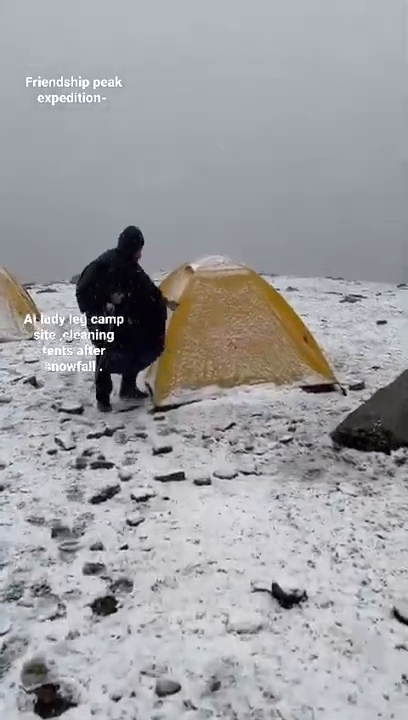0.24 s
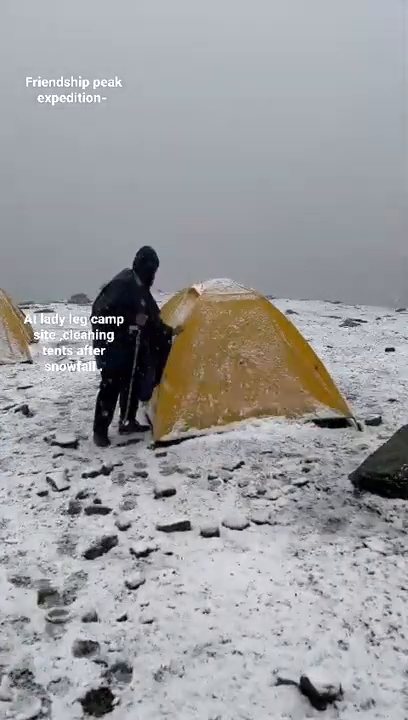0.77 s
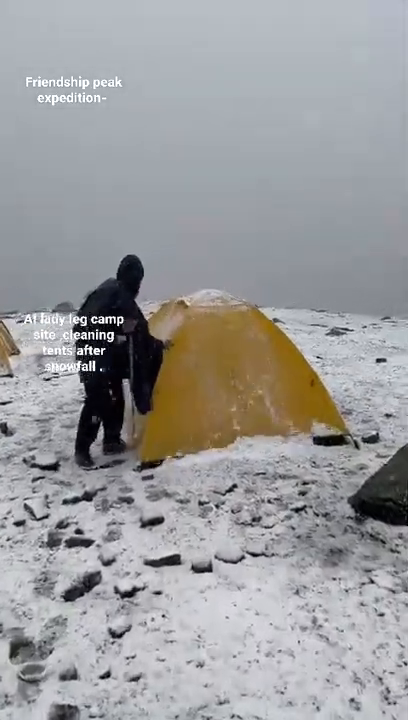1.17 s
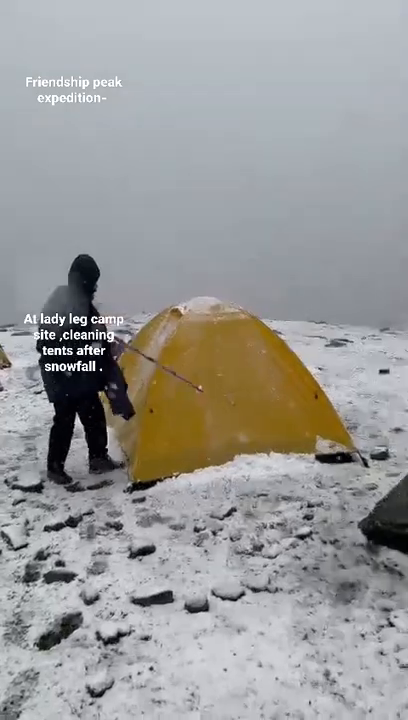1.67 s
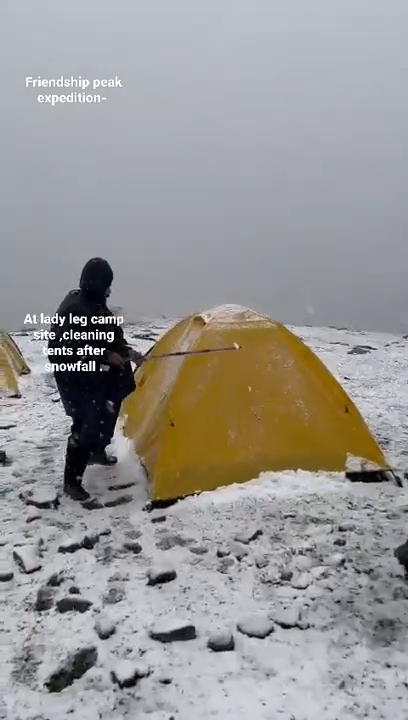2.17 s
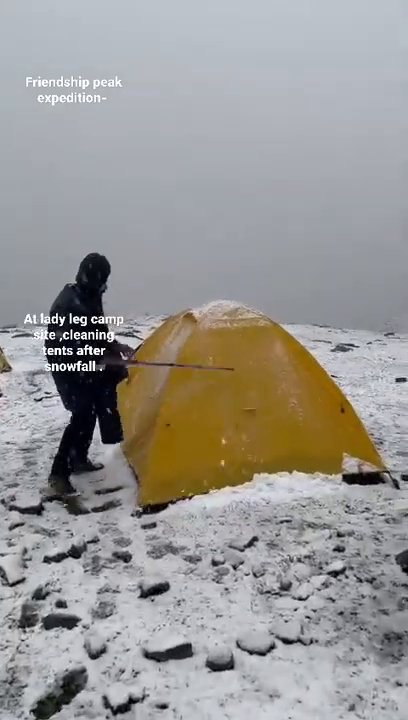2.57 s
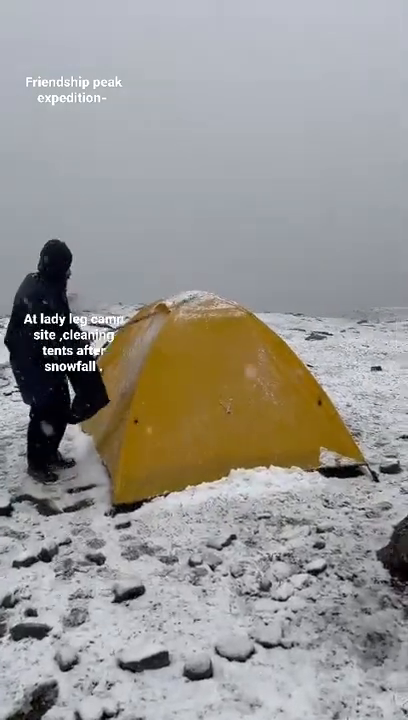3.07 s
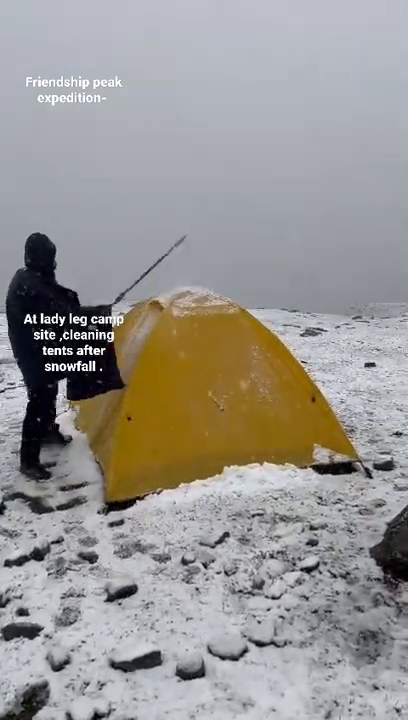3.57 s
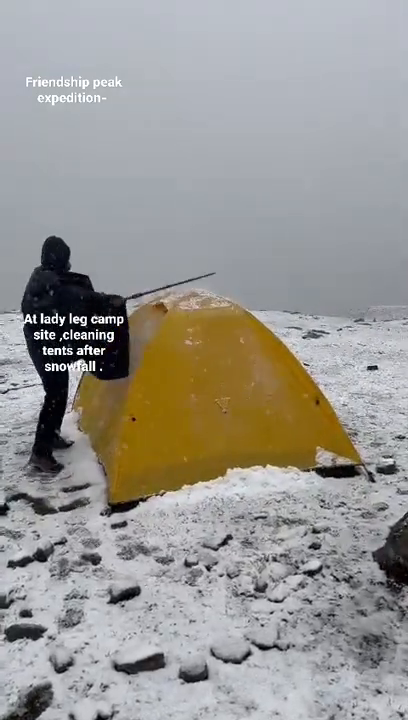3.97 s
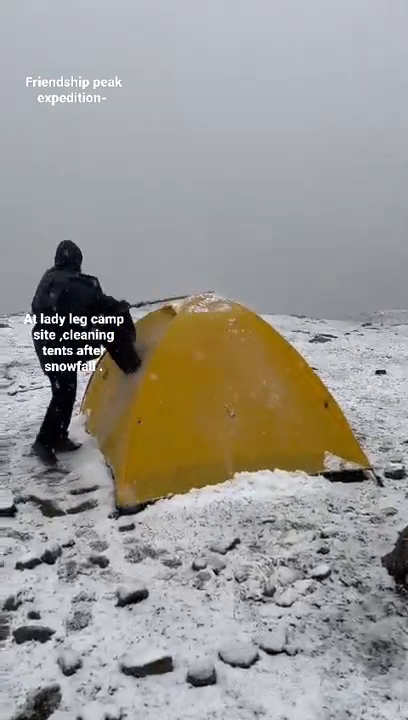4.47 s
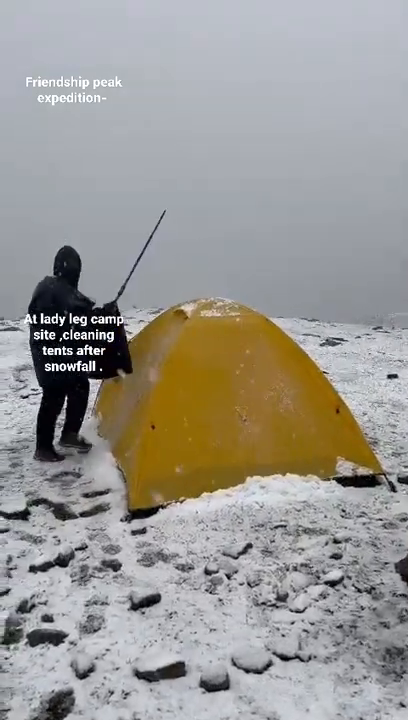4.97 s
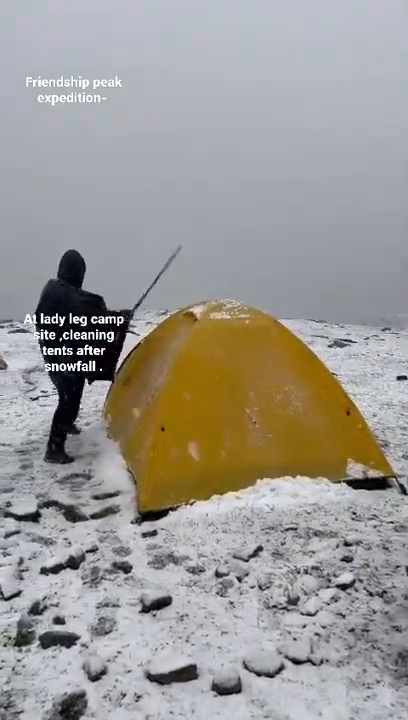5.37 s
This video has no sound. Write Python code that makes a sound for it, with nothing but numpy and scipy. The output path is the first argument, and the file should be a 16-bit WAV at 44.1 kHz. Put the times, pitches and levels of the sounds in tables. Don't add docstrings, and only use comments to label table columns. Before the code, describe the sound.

On an open snowy slope in light wind, tent cloth rustles and snow slides off with soft low thuds and small ticks. After about two and a half seconds a pole smacks the taut fabric repeatedly, hardest around four seconds, each crack followed by a hollow boom, flutter and sliding snow. After a pause, one last smack. Heard from a phone some metres away, dry and without echo.

```python
import sys
import numpy as np
from scipy import signal
from scipy.fft import rfft, irfft, next_fast_len
from scipy.io import wavfile
from scipy.ndimage import uniform_filter1d, minimum_filter1d

SR = 44100
rng = np.random.default_rng(int(sys.argv[2]) if len(sys.argv) > 2 else 0)


def boost(x):
    u = np.asarray(x, float) / 20
    return 10 ** u


def inscribe(sig):
    pcm = np.round(np.clip(np.atleast_2d(sig).T, -1, 1) * 32767)
    wavfile.write(sys.argv[1], SR, pcm.astype(np.int16))


N = 248238

# [t/s, crack level/dB, pole tick f/Hz, tick level over crack/dB, loosened snow level over crack/dB]
BLOWS = [
    (2.156, -52, 1840, 20, -27),
    (2.494, -18, 1550, -33, -8.5),
    (2.945, -19.5, 1570, 1, -13.5),
    (3.397, -20, 1780, -29, -8),
    (3.711, -12, 4160, -10, -18),
    (3.984, -8, 1790, -20, -17.5),
    (4.269, -12.5, 2220, -12, -13.5),
    (4.539, -12.5, 3010, 5, -11),
    (5.522, -17, 2620, 7, -11.5),
]
# [f/Hz, level/dB]
CRACK = [(150, -1.5), (330, -2.5), (720, 5), (1300, 1.5), (2200, -2), (3500, -4.5), (6000, -11),
         (9000, -14.5), (11500, -23), (12500, -48)]
# [f/Hz, arrival t/s]
LAG = [(100, 0.01323), (300, 0.00709), (600, 0.0026), (1500, 0.0005), (4000, 0.0002)]
# [f/Hz, level/dB]
SLAP = [(150, 2), (280, 1), (450, -1), (700, -11.5), (1100, -59)]


def evened(x):
    return x / np.sqrt(np.mean(x ** 2) + 1e-20)


def peak_one(x):
    return x / abs(x[0]).max()


def read(points, hz):
    f, value = np.transpose(points)
    return np.interp(np.log(hz + 1), np.log(f + 1), value, left=value[0])


def add(mix, s, sound):
    part = mix[..., round(s * SR):][..., :sound.shape[-1]]
    part += sound[..., :part.shape[-1]]


def colour(x, points, lag=None):
    size = next_fast_len(x.shape[-1] + 2048)
    hz = np.fft.rfftfreq(size, 1 / SR)
    gain = boost(read(points, hz)) * (hz < 1.05 * points[-1][0])
    if lag is not None:
        phase = 2 * np.pi * np.cumsum(read(lag, hz)) * hz[1]
        gain = gain * np.exp(-1j * phase)
    return irfft(rfft(x, size) * gain, size)[..., :x.shape[-1]]


def bed(points, patchy_db, flicker_db, grain_db, size):
    grains = boost(grain_db * np.repeat(rng.exponential(1, N // 40 + 1), 40)[:N])
    noise = colour(grains * rng.standard_normal((2, N)), points)
    f, t, z = signal.stft(noise, SR, nperseg=size)
    patches = uniform_filter1d(rng.standard_normal(z.shape[1:]), 5, 0)
    patches = evened(uniform_filter1d(patches, 8, 1))
    flicker = evened(uniform_filter1d(rng.standard_normal(len(t)), 3))
    z *= boost(patchy_db * patches + flicker_db * flicker)
    return evened(signal.istft(z, SR, nperseg=size)[1][:, :N])


def rustle():
    # [t/s, wind level/dB, drifting snow level/dB]
    weather = [(0, -56.5, -83.5), (.65, -49.5, -73.5), (1.45, -56, -64), (1.9, -55, -68),
               (2.25, -53.5, -77.5), (2.5, -55, -80.5), (2.9, -53, -65.5), (3.28, -53.5, -64.5),
               (3.499, -58, -68.5), (3.95, -52, -67.5), (4.45, -65, -63.5), (4.9, -59.5, -64),
               (5.3, -59, -69.5), (5.63, -48.5, -77.5)]
    # [start t/s, hold t/s, rustle level/dB, rumble level over rustle/dB]
    stirs = [(0.162, 0.036, -61.5, 1), (0.443, 0.12, -68, 1), (0.74, 0.13, -50, 8), (0.952, 0.097, -45, 4),
             (1.131, .26, -53, 5.5), (1.62, 0.027, -57.5, -2), (2.317, .12, -61.5, 2.5),
             (2.518, 0.045, -48.5, -3), (2.553, 0.027, -53.5, 8), (2.978, 0.12, -60.5, 0),
             (3.73, 0.15, -61, -9), (4.046, .08, -56.5, 4.5), (4.317, 0.047, -55.5, 7),
             (4.62, 0.093, -66.5, 17), (5.56, 0.089, -54.5, -1)]
    # [f/Hz, level/dB]
    body_curve = [(150, -2), (300, 0), (600, -3.5), (1200, -5), (2500, -9.5), (5000, -13), (7000, -19)]
    # [f/Hz, level/dB]
    fizz_curve = [(1500, -5.5), (3500, -4), (6000, -8.5), (8500, -6), (10500, -6.5), (11600, -6),
                  (12300, -50)]
    # [f/Hz, level/dB]
    rumble_curve = [(20, -36), (40, 4.5), (60, 1), (120, -0.5), (220, -8), (350, -22.5), (600, -20.5)]
    rise_db_per_s, fall_db_per_s = 300, 64.5
    t = np.arange(N) / SR
    s, *columns = np.transpose(weather)
    wind, drift = (boost(np.interp(t, s, c)) for c in columns)
    stir, heft = np.zeros(N), np.zeros(N)
    for start, hold, db, rumble_db in stirs:
        swell_db = np.maximum(rise_db_per_s * (start - t), 0)
        decay_db = np.maximum(fall_db_per_s * (t - start - hold), 0)
        shape = boost(db - swell_db - decay_db)
        stir = np.hypot(stir, shape)
        heft = np.hypot(heft, boost(rumble_db) * shape)
    weather_stir = np.hypot(boost(-10.5) * wind, boost(-4.5) * drift)
    cloth = np.hypot(stir, weather_stir)
    snow = np.hypot(drift, boost(-15.5) * stir)
    body = boost(1.5) * cloth * bed(body_curve, patchy_db=3.0, flicker_db=1.5, grain_db=1.5, size=512)
    fizz = boost(9.5) * snow * bed(fizz_curve, patchy_db=1.4, flicker_db=1.2, grain_db=0.0, size=512)
    rumble = bed(rumble_curve, patchy_db=5.5, flicker_db=1.0, grain_db=0.35, size=1024)
    return body + fizz + boost(0.5) * np.hypot(wind, heft) * rumble


def moan(width_hz=11.7):
    # [t/s, f/Hz, level/dB]
    course = [(0, 240.7, -87), (0.298, 290.2, -64.5), (0.6, 248.2, -74), (1.697, 149.6, -69),
              (2.1, 238.8, -68), (2.399, 203, -90.5), (3.601, 202, -87), (4.15, 180, -61),
              (4.5, 243.4, -64), (4.9, 208, -71), (5.25, 214.7, -62.5), (5.63, 207, -81)]
    s, *columns = np.transpose(course)
    hz, db = (np.interp(np.arange(N) / SR, s, c) for c in columns)
    lowpass = signal.butter(2, width_hz / 2, fs=SR)
    slow = signal.lfilter(*lowpass, rng.standard_normal((2, N)))
    carrier = np.exp(2j * np.pi * np.cumsum(hz) / SR)
    return boost(db) * evened(((slow[0] + 1j * slow[1]) * carrier).real)


def boom(hz, cycles, sag):
    t = np.arange(round(.15 * SR)) / SR
    turns = np.cumsum(hz * (1 + sag * np.exp(-t * hz / 0.32))) / SR
    swing = np.sin(2 * np.pi * turns) * np.sqrt(turns) * np.exp(-(turns / cycles) ** 2)
    return swing / abs(swing).max()


def snap(length, spread_db):
    t = np.arange(round(.06 * SR)) / SR
    sizes = boost(spread_db * rng.exponential(1, (2, len(t)))) * rng.standard_normal((2, len(t)))
    return sizes * np.minimum(t / 0.0019, 1) * np.exp(-(t / length) ** 0.61)


def lumps():
    # [t/s, level/dB, f/Hz, slap level over thud/dB]
    thuds = [(0.516, -42, 70.1, -6), (0.739, -32.5, 87, -8), (0.778, -33, 53.8, -13),
             (0.836, -31, 53.6, 1.5), (0.951, -35, 181, -0.5), (1.005, -29, 98, -3.5),
             (1.029, -28.5, 79, 1), (1.068, -32, 153, -25), (1.234, -28, 152, -5.5), (1.27, -33, 119, -3.5),
             (1.398, -33.5, 186, -6), (1.423, -31, 207, -23), (1.46, -32, 99, -28), (1.623, -32, 173, -15),
             (1.75, -39.5, 144, -8), (2.575, -24, 210, -13), (2.629, -28.5, 102, -10.5),
             (2.788, -37, 52.3, -22), (2.864, -47, 51.1, 1), (3.01, -38.5, 244, -7.5),
             (3.103, -38.5, 95, -2), (3.151, -33, 80.7, -12), (3.844, -32.5, 95, -19),
             (4.329, -28, 84.4, -26), (4.623, -28, 65.5, -15), (4.722, -29, 116, -12),
             (4.839, -34.5, 63.1, -35), (5.07, -34, 52, -22), (5.365, -27, 61, -12), (5.594, -33, 51.1, -1)]
    out = np.zeros((2, N))
    for s, db, hz, slap_db in thuds:
        contact = snap(length=0.004, spread_db=-8.0)
        add(out, s, boost(db - 7.0) * boom(hz, cycles=1.49, sag=0.96))
        add(out, s, boost(db + slap_db - 3) * peak_one(colour(contact, SLAP, LAG)))
        add(out, s, boost(db - 20) * peak_one(colour(contact, CRACK[2:7])))
    return out


def ticks():
    # [t/s, level/dB, f/Hz]
    contacts = [(0.695, -43, 570), (0.739, -43, 1500), (1.008, -30.5, 900), (1.262, -36, 416),
                (1.623, -36, 400), (1.609, -41, 450), (1.721, -44.5, 900), (1.753, -44, 600),
                (1.726, -46, 5540), (2.446, -40.5, 496), (2.576, -38.5, 1200), (2.611, -33.5, 479),
                (2.791, -44.5, 1470), (2.866, -45.5, 600), (3.01, -37, 1300), (3.107, -40.5, 746),
                (3.842, -42.5, 720), (4.624, -36.5, 611), (4.724, -42.5, 1500), (5.361, -40.5, 1100),
                (5.363, -35.5, 380), (5.597, -38, 720)]
    out = np.zeros((2, N))
    for s, db, hz in contacts:
        hump = [(hz / 3, -22), (hz, 0), (hz * 2, -9), (hz * 4, -24), (24000, -36)]
        add(out, s, boost(db) * peak_one(colour(snap(length=0.0012, spread_db=1), hump)))
    return out


def blows():
    # [f/Hz, t60/s]
    tail_t60 = [(60, 0.43), (160, 0.12), (420, 0.15), (1100, 0.099), (2910, 0.11), (7680, 0.11)]
    usual_crack_db = -13.5
    out, t = np.zeros((2, N)), np.arange(400) / SR
    for s, db, hz, tick_db, tail_db in BLOWS:
        sizzle_db = -7.5 - 0.47 * np.clip(db - usual_crack_db, -22, 8)
        crack = colour(snap(length=0.0023, spread_db=3.5), CRACK[:5] + [(3500, -19.5)], LAG)
        sizzle = colour(snap(length=0.0016, spread_db=-1.0), [(2000, -12.5)] + CRACK[5:])
        add(out, s, boost(db - 1) * peak_one(crack))
        add(out, s, boost(db + sizzle_db + 8) * peak_one(sizzle))
        tick = np.sin(2 * np.pi * hz * t) * t / 0.0026 * np.exp(1 - t / 0.00091)
        add(out, s, boost(db + tick_db) * tick)
        swish = colour(rng.standard_normal((2, 400)), CRACK[3:]) * t / t[-1]
        add(out, s - t[-1], boost(db - 25.5) * peak_one(swish))
        noise = colour(rng.standard_normal((2, 13230)), CRACK)
        f, frame, z = signal.stft(noise, SR, nperseg=256)
        fade = boost(-60 * frame / (1.554 * read(tail_t60, f))[:, None])
        fade = fade * (frame > read(LAG, f)[:, None] + .003)
        flicker = boost(1.2 * rng.standard_normal(len(frame)))
        z = z / np.sqrt(np.mean(abs(z) ** 2)) * fade * flicker
        add(out, s, boost(db + tail_db - 22.5) * signal.istft(z, SR, nperseg=256)[1])
    return out


def shudder(t60, rise):
    # [f/Hz, level/dB]
    flutter_curve = [(30, -36), (55, 13), (90, 1.5), (200, -2), (400, -20.5), (600, -14)]
    t = np.arange(round(.3 * SR)) / SR
    flutter = evened(colour(rng.standard_normal(len(t)), flutter_curve))
    return flutter * (1 - np.exp(-t / rise)) * boost(-60 * t / t60)


def dome():
    # [boom level/dB, f/Hz, swings, slap level over boom/dB]
    answers = [
        (-52, 170, 1.7, -10),
        (-27, 124, 0.75, -2.5),
        (-42, 160, 0.67, -14),
        (-25, 121, 1.2, 2),
        (-15.5, 114, 1.4, -10.5),
        (-11.5, 101, 1.22, -25),
        (-16, 101, 1.37, -3),
        (-24, 99.5, 1.85, -8),
        (-29, 94, 1.8, -5),
    ]
    boom_delay_s = 0.00955
    out = np.zeros((2, N))
    for (blow_s, crack_db, _, _, loose_db), (db, hz, swings, slap_db) in zip(BLOWS, answers):
        s = blow_s + boom_delay_s
        add(out, s, -boost(db) * boom(hz, swings, sag=0.74))
        add(out, s + 0.0025, boost(crack_db + loose_db - 3.5) * shudder(t60=0.27, rise=0.0043))
        slap = colour(snap(length=0.0062, spread_db=2.0), SLAP)
        add(out, s - .003, boost(db + slap_db) * peak_one(slap))
    return out


def ports(a, b):
    # [f/Hz, likeness 0..1]
    likeness = [(60, 1), (250, .99), (700, 0.78), (1500, 0.85), (2500, 0.38), (4500, 0.16), (5500, 0.97),
                (12000, 0.68)]
    # [f/Hz, left minus right/dB]
    shading = [(150, 0.5), (300, 1.5), (470, 4.5), (700, 7.5), (1100, 6.5), (1500, 4.5), (1900, 2.5),
               (3600, 1.5), (6000, 1)]
    # [f/Hz, left leads by/rad]
    phase_lead = [(60, 0), (700, 0), (1300, -.5), (1800, 0), (2500, 2.5), (3000, 1.6), (4000, .2),
                  (4700, 1.2), (5300, 2.2), (6100, 3.14), (7900, 6.28), (10200, 9.4), (11100, 10.2),
                  (12000, 11.4)]
    hz = np.fft.rfftfreq(N, 1 / SR)
    same = np.clip(read(likeness, hz), 0, 1)
    lean = boost(read(shading, hz) / 2)
    right = same * rfft(a) + np.sqrt(1 - same ** 2) * rfft(b)
    right = right * np.exp(-1j * read(phase_lead, hz)) / lean
    return np.array([irfft(rfft(a) * lean, N), irfft(right, N)])


def scene():
    a, b = rustle() + moan() + lumps() + ticks() + blows() + dome()
    return ports(a, b)


def joint_stereo(x, jump_db=26., open_s=.011, waver_db=1.2, top_share=.15):
    # [f/Hz, level/dB]
    drop_curve = [(1500, -30), (1800, -9), (2500, -4.8), (4900, -4.8), (5300, -2.3), (7000, -1.7),
                  (12000, -2)]
    treble = abs(uniform_filter1d((np.diff(x, prepend=0) ** 2).sum(axis=0), 130))
    jumps = treble > boost(jump_db) * np.roll(abs(uniform_filter1d(treble, 900)), 900)
    jumps[:2000] = False
    held = -minimum_filter1d(-1. * jumps, round(open_s * SR))
    attack = x * uniform_filter1d(np.roll(held, 100), 130)
    left, right = x - attack
    form = dict(window="cosine", nperseg=2048, noverlap=1024)
    lead = 1024 - 529
    shift = np.pad([left + right, left - right], ((0, 0), (lead, 0)))
    f, t, z = signal.stft(shift, SR, **form)
    bands = (abs(z[:, :1024]) ** 2).reshape(2, 128, 8, -1).sum(axis=2) + 1e-20
    limit_db = read(drop_curve, f[4:1024:8])[:, None] + waver_db * rng.standard_normal(bands.shape)
    keep = bands > bands[::-1] * boost(2 * limit_db)
    lucky = rng.random((2, 31, len(t))) < [[[top_share]], [[.1]]]
    keep[:, 66:] &= np.repeat(lucky, 2, axis=1)
    z[:, :1024] *= np.repeat(keep, 8, axis=1)
    mid, side = signal.istft(z, SR, **form)[1][:, lead:][:, :N]
    return attack + np.array([mid + side, mid - side]) / 2


def band_limit(x):
    return signal.sosfilt(signal.butter(12, 12980, fs=SR, output="sos"), x)


def record(dry):
    bass_cut = signal.butter(2, 32, "high", fs=SR, output="sos")
    mix = joint_stereo(signal.sosfilt(bass_cut, dry))
    return band_limit(mix)


dry = scene()
out = record(dry)
inscribe(out)
```